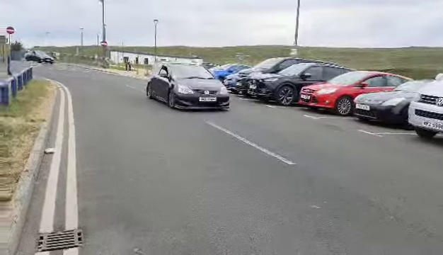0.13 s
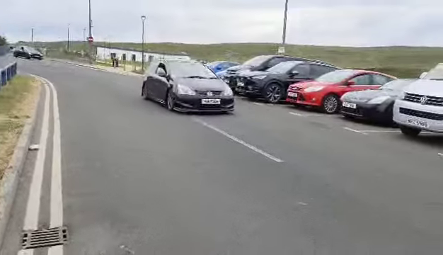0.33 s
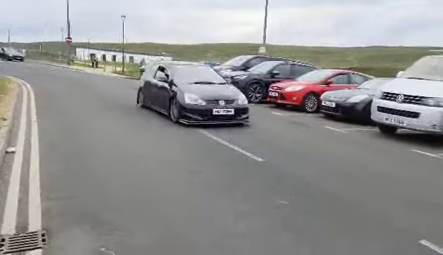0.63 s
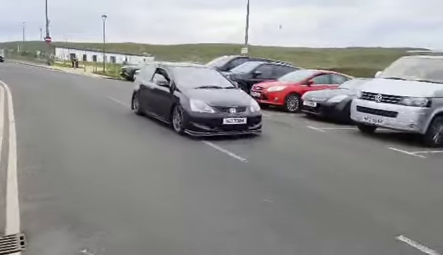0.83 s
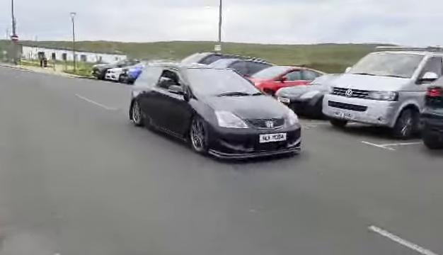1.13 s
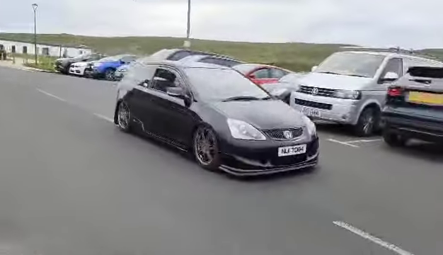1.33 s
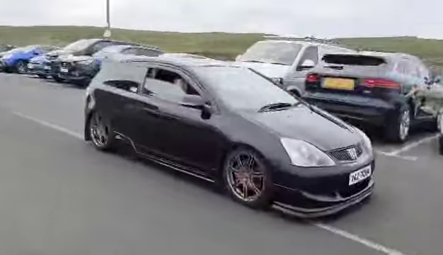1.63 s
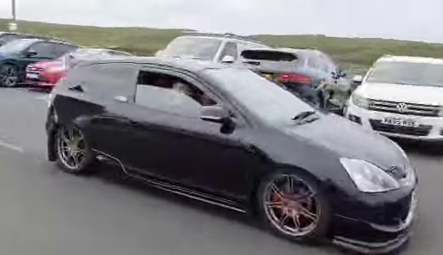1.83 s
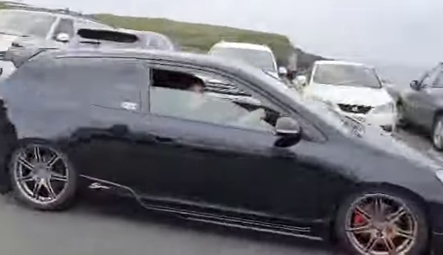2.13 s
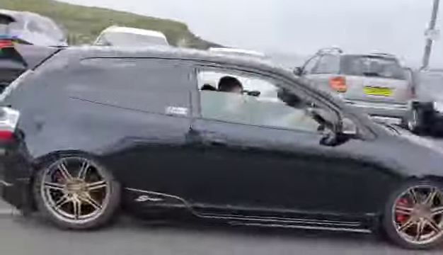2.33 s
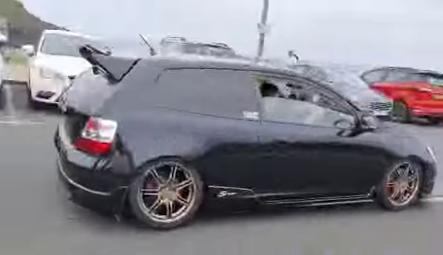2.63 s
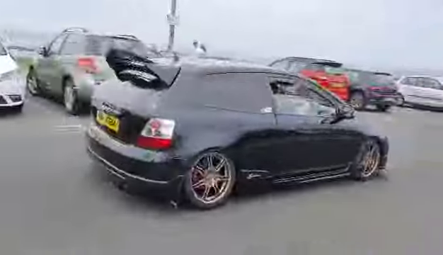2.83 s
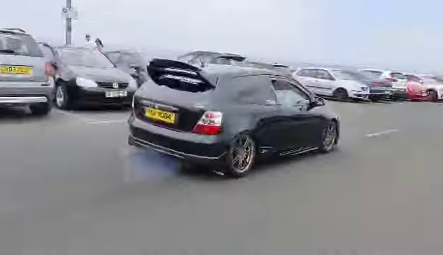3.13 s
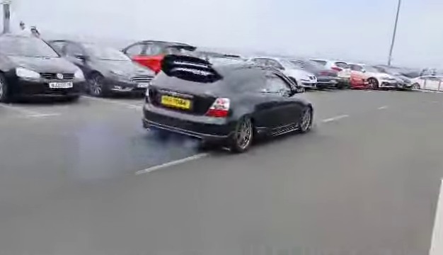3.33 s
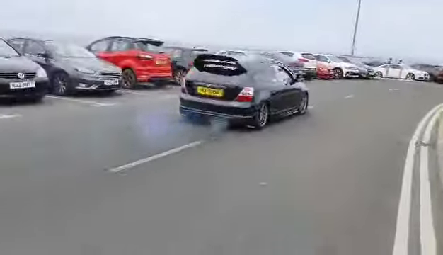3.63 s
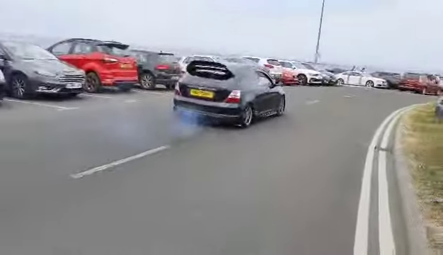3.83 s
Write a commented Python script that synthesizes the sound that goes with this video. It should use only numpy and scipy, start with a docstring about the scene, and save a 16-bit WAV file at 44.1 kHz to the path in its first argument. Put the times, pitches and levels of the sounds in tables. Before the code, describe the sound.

A small car with a loud exhaust burbles closer in an open car park, pops sharply as it passes the nearby microphone, then revs up and stutters on its limiter, with tyre roar beneath.

```python
"""In a seaside car park, a four-cylinder hatchback with a loud exhaust burbles up, pops as it passes close by
and revs into its limiter, where fuel cuts alternate with hissing blasts. Each firing rings the pipe (boom, hum,
rasp) and makes a puff in the noise of the gas. Tyre roar and air rumble are coloured noise, a small bird whistles
and chirps at first in gliding sines, and parked cars scatter the sound as a short burst of decaying noise."""
import sys
import numpy as np
from scipy import signal
from scipy.fft import rfft, irfft
from scipy.io import wavfile
from scipy.ndimage import uniform_filter1d, map_coordinates

SR = 44100
rng = np.random.default_rng(int(sys.argv[2]) if len(sys.argv) > 2 else 0)


def pcm_store(signal):
    """Save signal as 16-bit PCM."""
    levels = np.round(np.clip(np.atleast_2d(signal), -1, 1) * 32767)
    wavfile.write(sys.argv[1], SR, levels.astype(np.int16).T)


N = 176400
TOP_HZ = 13400  # upper edge of the microphone's range


def undb(db):
    """Decibels to gain."""
    return 10 ** (np.asarray(db) / 20)


def clock():
    """Time of every sample in seconds."""
    return np.arange(N) / SR


def curve(rows, axis=1):
    """One column of a table, joined by straight lines in time."""
    rows = np.array(rows)
    return np.interp(clock(), rows[:, 0], rows[:, axis])


def gate(start, end, rise_s, tail_s):
    """Attack, hold and exponential release."""
    t = clock()
    return np.clip((t - start) / rise_s, 0, 1) * np.exp(-np.maximum(t - end, 0) / tail_s)


def unit(x):
    """Scale to rms 1."""
    return x / np.sqrt(np.mean(x ** 2))


def even(x, size=1800):
    """Hold a pulse train near rms 1 whatever its rate, by dividing by its smoothed power."""
    power = uniform_filter1d(uniform_filter1d(x ** 2, size), size)
    return x / np.sqrt(np.abs(power) + 1e-14)


def walk(rate):
    """Smooth random drift, spread 1, changing about `rate` times a second."""
    size = int(SR / rate)
    return unit(uniform_filter1d(uniform_filter1d(rng.standard_normal(N), size), size))


def ring(x, colour):
    """Minimum-phase filter of the given colour: it rings after each pulse, never before."""
    hz, db = np.array(colour).T
    n = 2 * N
    f = np.maximum(np.arange(N + 1) * SR / n, 1)
    octaves_outside = np.maximum(np.log2(hz[0] / f), 0) + np.maximum(np.log2(f / hz[-1]), 0)
    level_db = np.interp(np.log(f), np.log(hz), db) - 24 * octaves_outside
    # folding the cepstrum onto positive time makes the filter causal
    cepstrum = irfft(np.log(undb(level_db)))
    cepstrum[1:N] *= 2
    cepstrum[N + 1:] = 0
    return irfft(rfft(x, n) * np.exp(rfft(cepstrum)))[..., :N]


def noise(colour):
    """Stereo noise at rms 1, alike in the bass and unrelated in the treble."""
    mid, side = rfft(rng.standard_normal((2, N)))
    blend_hz = 1180  # the ears are half alike here
    alike = 1 / (1 + (np.arange(len(mid)) * SR / N / blend_hz) ** 2)
    mid, side = mid * np.sqrt(1 + alike), side * np.sqrt(1 - alike)
    return unit(ring(irfft(np.array([mid + side, mid - side]), N), colour))


def pulses(times, sizes, order=8):
    """Band-limited clicks (windowed sincs) at exact times between samples."""
    out = np.zeros(N)
    at = times[:, None] * SR
    index = at.astype(int) + np.arange(1 - order, order + 1)
    shape = sizes[:, None] * np.sinc(index - at) * np.sinc((index - at) / order)
    inside = (index >= 0) & (index < N)
    np.add.at(out, index[inside], shape[inside])
    return out


# how the car rolls by: start_s, tyres_db, rumble_db
ROLLING = [(.07,-55,-67),(.25,-44.5,-43),(.7,-38.5,-61),(1.05,-37,-62),(1.5,-34.5,-51),(1.9,-36,-50),(2.3,-35,-28),(2.9,-29,-33.5),(3.4,-31.5,-39.5),(4,-35.5,-38.5)]
# colour of the tyre roar: band_hz, level_db
TYRE_COLOUR = [(300,-7.5),(450,0.5),(700,-3.5),(860,-8.5),(1140,-4),(1500,-10),(2400,-12),(2900,-15),(3700,-13),(5000,-8.5),(6100,-10.5),(6900,-19.5),(8200,-29.5),(13000,-49.5)]
# colour of the air rumble: band_hz, level_db
RUMBLE_COLOUR = [(20,-13.5),(45,-16),(80,-4.5),(150,-3.5),(300,-3.5),(600,-31.5),(1500,-60)]


def road():
    """Tyre roar swells as the car goes by; moving air rumbles on each port, mostly in common."""
    tyres = noise(TYRE_COLOUR) * undb(curve(ROLLING) + 1.67 * walk(20))
    pressure = rng.standard_normal((2, N)) + 5.2 * rng.standard_normal(N)
    air = unit(ring(pressure, RUMBLE_COLOUR))
    return tyres + air * undb(curve(ROLLING, axis=2))


# the bird's whistle: start_s, pitch_hz, level_db
WHISTLE = [(.1,5300,-82),(.15,5230,-55),(.2,5220,-56),(.225,5240,-34),(.262,5130,-37.5),(.285,4850,-52),(.32,4950,-34),(.345,4940,-48),(.37,4960,-31),(.42,4730,-71)]
# its notes, level before the arched swell, octave relative to the note:
# start_s, length_s, start_hz, end_hz, level_db, octave_db
CHIRPS = [(0.065,0.15,4150,4050,-58,-38),(0.416,0.11,3670,3550,-39,-16.5)]


def bird():
    """A thin wavering whistle, and falling notes with a weak octave: sines whose pitch glides."""
    t = clock()
    waver = 1 + 0.0039 * walk(74)
    whistle = np.sin(2 * np.pi * np.cumsum(curve(WHISTLE) * waver) / SR)
    out = whistle * undb(curve(WHISTLE, axis=2)) * (t < WHISTLE[-1][0])
    for start, length, from_hz, to_hz, db, octave_db in CHIRPS:
        along = np.clip((t - start) / length, 0, 1)
        pitch_hz = (from_hz + (to_hz - from_hz) * along) * waver
        angle = 2 * np.pi * np.cumsum(pitch_hz) / SR
        swell = np.sqrt(2 * np.abs(np.sin(np.pi * along)))
        out = out + undb(db) * swell * (np.sin(angle) + undb(octave_db) * np.sin(2 * angle))
    return out


def scatter(x):
    """Short diffuse echo from the parked cars, thin in the bass and different in each ear."""
    t = clock()[:SR // 2]
    t60_s = 0.22
    tail = rng.standard_normal((2, len(t))) * undb(-60 * t / t60_s)
    tail /= np.sqrt(np.sum(tail ** 2, axis=1, keepdims=True))
    tail = signal.sosfilt(signal.butter(1, 130, "high", fs=SR, output="sos"), tail)
    return signal.fftconvolve(x * np.ones((2, 1)), tail, axes=1)[:, :N]


# lag of the left ear as the tailpipe swings past: start_s, lag_ms
EAR_LAG = [(1.3,0.0068),(1.8,-0.042),(2.2,0.21),(2.75,0.23),(3.2,0.093),(3.8,0.024)]


def two_ears(x):
    """Sound from the side reaches one ear a little later; each ear takes half the lag."""
    half_lag = curve(EAR_LAG) / 1000 * SR / 2
    return np.array([map_coordinates(x, [np.arange(N) + side * half_lag], mode="nearest") for side in (-1, 1)])


# exhaust pops, and the bangs that open the limiter's blasts: start_s, thump_db, bark_db, crack_db
# (crack before the trims in pops())
POPS = [(1.494,-8,-40,-49),(1.965,-8,-19.5,-38),(2.027,-2.5,-11,-43),(2.039,-20,-10.5,-12),(2.295,-9.5,-15,-50),(2.304,-6.5,-15,-50),(2.328,-7,-3.5,-10.5),(2.354,-9,-12,-9.5),(3.264,-41,-30,-9.5),(3.546,-22,-18,-7.5),(3.829,-14.5,-14,-10.5),(3.841,-18,-10,-26)]
# colour of a pop's thump: band_hz, level_db
THUMP_COLOUR = [(60,-16.5),(150,1.5),(250,1),(400,-20.5),(900,-47)]


def pops():
    """Unburnt fuel goes off in the pipe: a thump, a bark, a shock front and a short crack of gas."""
    times, thump_db, bark_db, crack_db = np.array(POPS).T
    snap_db = crack_db - 2.5  # shock front
    body = 0
    for colour, db in ((THUMP_COLOUR, thump_db), (RASP_COLOUR, bark_db), (GAS_COLOUR, snap_db)):
        wave = ring(pulses(times, undb(db)), colour)
        # the highest peak takes the level of the loudest pop
        body = body + wave / np.abs(wave).max() * undb(db.max())
    crack = sum(gate(s, s, 0.00021, tail_s=0.0045) * undb(db) for s, db in zip(times, crack_db))
    return body, 0.5 * crack * noise(GAS_COLOUR)


# engine speed before its waver, burbling up: start_s, firings_hz
SPEED_LOW = [(0.1, 51), (0.23, 50.8), (0.502, 49.2), (0.602, 53.7), (0.994, 50), (1.178, 56), (1.444, 44.3),
             (1.498, 47.9), (1.644, 57.6), (1.728, 63), (1.98, 83.7)]
# engine speed before its waver, revving: start_s, firings_hz
SPEED_HIGH = [(2.06, 81.83), (2.102, 93.25), (2.15, 99.74), (2.222, 108.2), (2.3, 113.3), (2.37, 110.9),
              (2.602, 126.3), (2.658, 126.1), (2.796, 161), (3.0, 210.9), (3.03, 216.1)]
CUT_HZ, RESUME_HZ = 213, 204.9  # firing rate before waver where fuel stops and returns
LOW_WAVER, REV_WAVER, COAST_WAVER = 0.013, 0.0034, 0.0153  # spread, share of the speed


def firing_phase():
    """Count of firings: the driver's rev, then the limiter's saw between two speeds, with a random waver."""
    saw = []
    for cut, back, *_ in LIMITER:
        saw += [(cut, CUT_HZ), (back, RESUME_HZ)]
    waver = curve([(1.5, LOW_WAVER), (2.6, REV_WAVER), (3.1, COAST_WAVER)]) * walk(86)
    return np.cumsum(curve([*SPEED_LOW, *SPEED_HIGH, *saw]) * (1 + waver)) / SR


def firings(phase, scatter_db, jitter_s, uneven_db=0):
    """One pulse per firing, each a little different in time and strength; a four-step pattern may add to it."""
    k = np.arange(1, int(phase[-1]))
    chance = rng.standard_normal((len(k), 2))
    times = np.interp(k, phase, clock()) + jitter_s * chance[:, 0]
    strength_db = uneven_db * np.cos(np.pi * k / 2) + scatter_db * chance[:, 1]
    return pulses(times, undb(strength_db))


# rev limiter, hum as the cut begins, rasp as it ends, throb depth 0-1:
# cut_s, back_s, hum_db, throb_depth, rasp_db, blast_db
LIMITER = [(3.048,3.263,-9,0.02,-15.5,-15),(3.328,3.544,-15,0.9,-17.5,-16.5),(3.608,3.827,-13.5,0.71,-18.5,-16),(3.885,4.097,-14,0.34,-19,-26)]
HUM_FADE_DB_S, RASP_GROW_DB_S = -61, 35.5  # slopes during a cut, dB per second
THROB_HZ, THROB_FIRST_S = 21.8, 0.047  # rate; first crest after the cut
BLAST_TAIL_S = 0.0083
IGNITION_DB, IGNITION_S = -13, 0.012  # bright flare under the blast level, and its decay


def limiter():
    """Limiter envelopes: a throbbing hum and growing rasp in each fuel cut, a flaring blast when it returns."""
    hum, rasp, blast, flare, burning = np.zeros((5, N))
    next_cuts = [row[0] for row in LIMITER[1:]] + [np.inf]
    for (cut, back, hum_db, throb, rasp_db, blast_db), until in zip(LIMITER, next_cuts):
        age = np.clip(clock() - cut, 0, back - cut)
        coast = gate(cut, back, 0.065, 0.0034)
        burn = gate(back, until, 0.0021, BLAST_TAIL_S)
        throbbing = 1 + throb * np.cos(2 * np.pi * THROB_HZ * (age - THROB_FIRST_S))
        hum += coast * undb(hum_db + HUM_FADE_DB_S * age) * throbbing
        rasp += coast * undb(rasp_db + RASP_GROW_DB_S * (age - (back - cut)))
        blast += burn * undb(blast_db)
        flare += gate(back, back, 0.0017, IGNITION_S) * undb(blast_db + IGNITION_DB)
        burning += burn
    return hum, rasp, blast, flare, burning


# the pipe's two low resonances: start_s, boom_db, hum_db
LOW_LEVELS = [(0.07, -56, -46.5), (0.28, -44, -45), (0.41, -38.5, -33.5), (0.62, -24.5, -27),
              (0.82, -25, -30.5), (1.0, -39.5, -36.5), (1.44, -26, -20), (1.485, -26, -20),
              (1.51, -17, -17.5), (1.59, -12, -17), (1.67, -23, -13), (1.78, -14, -14), (1.88, -22, -21),
              (1.98, -19, -15), (2.05, -22, -24.5), (2.16, -21.5, -12.5), (2.25, -14.5, -37),
              (2.3, -18, -20), (2.35, -20.5, -22), (2.62, -15, -18.5), (2.68, -14, -29.5),
              (2.72, -19.5, -19), (2.79, -20.5, -19), (2.83, -28, -16), (3.04, -40, -21)]
# colour of the boom: band_hz, level_db
BOOM_COLOUR = [(45,-32),(60,-23),(80,-11),(105,-0.5),(135,5),(160,-6),(190,-13.5),(260,-49)]
# colour of the hum: band_hz, level_db
HUM_COLOUR = [(90,-38.5),(140,-26.5),(180,6.5),(215,1.5),(250,8),(275,-6),(315,-8),(360,-23),(480,-30),(900,-54.5)]
FIRING_JITTER_S = 0.00005


def low_tone(phase, pulling, coast_hum, burning):
    """Firings ring the pipe's boom and, in opposite polarity, its hum."""
    train = firings(phase, 1.5, FIRING_JITTER_S)
    boom = even(ring(train, BOOM_COLOUR)) * pulling * undb(curve(LOW_LEVELS))
    hum_level = pulling * undb(curve(LOW_LEVELS, axis=2)) + coast_hum + burning * undb(-29.5)
    return boom - even(ring(train, HUM_COLOUR)) * hum_level


# the pipe's rasp before the direct and scattered trims: start_s, level_db
RASP_LEVEL = [(.2,-80.5),(.7,-47),(1.05,-72),(1.51,-46),(1.75,-42.5),(1.826,-26.5),(1.874,-55),(1.94,-38),(1.97,-40),(2.01,-46),(2.06,-29.5),(2.104,-20),(2.16,-29.5),(2.242,-44),(2.32,-34),(2.345,-22),(2.4,-20.5),(2.516,-18.5),(2.63,-24),(2.75,-20),(2.9,-20.5),(3.04,-26.5)]
# colour of the rasp under load, also the bark of a pop: band_hz, level_db
RASP_COLOUR = [(200,-40),(350,-7.5),(470,-6.5),(595,2.5),(650,-2),(740,5.5),(850,3),(970,-2),(1100,-34),(1300,-18),(1800,-36),(2450,-18.5),(3100,-53),(7000,-54)]
# colour of the rasp while fuel is cut: band_hz, level_db
COAST_COLOUR = [(200,-24),(420,-15),(530,-31),(590,5.5),(630,0),(680,5),(740,-9),(800,1.5),(840,2),(900,-1),(1000,-10),(1300,-23),(1800,-27.5),(2450,-26.5),(4000,-39.5)]


def rasp_tone(phase, pulling, coast_rasp, burning):
    """Firings ring the pipe's upper resonances; unloaded, the four cylinders differ in strength."""
    loaded = even(ring(firings(phase, 2, FIRING_JITTER_S), RASP_COLOUR))
    unloaded = even(ring(firings(phase, 3.5, 0.00006, uneven_db=2.5), COAST_COLOUR))
    loaded_level = pulling * undb(curve(RASP_LEVEL)) + burning * undb(-33)
    return loaded * loaded_level + unloaded * coast_rasp


def torn(x, count=28):
    """Turbulence makes each band of the hiss flicker alone: narrow bands swell and sink independently."""
    spectrum = rfft(x)
    place = np.minimum(np.arange(spectrum.shape[-1]) * SR / N / TOP_HZ, 1) * count
    out = 0
    for k in range(count + 1):
        band = irfft(spectrum * np.maximum(1 - np.abs(place - k), 0), N)
        out = out + band * unit(undb(4 * walk(43)))  # 4 dB spread
    return out


# gas hiss up to the first fuel cut: start_s, level_db
GAS_LEVEL = [(.2,-76),(1.3,-53),(2.03,-42.5),(2.042,-25),(2.07,-32.5),(2.11,-23.5),(2.2,-38),(2.32,-50),(2.36,-23.5),(2.41,-23),(2.48,-19.5),(2.68,-22),(2.74,-18),(2.92,-17),(3.03,-12.5)]
# colour of the gas hiss, the flares and the cracks: band_hz, level_db
GAS_COLOUR = [(1200,-5.5),(1900,-20.5),(2430,0.5),(2850,-16),(3300,-2.5),(4200,-5.5),(5800,3.5),(7300,-8.5),(10200,-8),(13300,-24)]
# colour of the blasts: band_hz, level_db
BLAST_COLOUR = [(53, -36), (90, -15), (208, -0.5), (330, -12.5), (442, -5.5), (746, -19.5), (863, -10),
                (2040, -14.5), (3510, -12), (4240, -14), (5450, -6.5), (8280, -20.5), (12600, -37.5)]
# colour of the hiss that lingers from the first cut: band_hz, level_db
COAST_GAS_COLOUR = [(650,-25),(1100,3),(1650,-15),(2360,10),(2900,-8.5),(5860,-21),(10300,-24)]
# near the limiter the hiss broadens into a blast: start_s, end_s
FULL_BLAST_S = (2.82, 3.132)


def gas_hiss(phase, pulling, blast, flare):
    """Turbulent gas: flickering noise that pulses once per firing with a rough grain."""
    grain = unit(uniform_filter1d(rng.standard_normal(N), size=24))
    pulse = 1 + 0.23 * np.cos(2 * np.pi * (phase - 0.15))
    puffs = unit(pulse * undb(0.8 * grain))  # 0.8 dB grain
    broad = np.interp(clock(), FULL_BLAST_S, (0, 1))
    jet = noise(GAS_COLOUR) * np.sqrt(1 - broad) + noise(BLAST_COLOUR) * np.sqrt(broad)
    pulled = jet * pulling * undb(curve(GAS_LEVEL))
    gas = torn(pulled + noise(BLAST_COLOUR) * blast + noise(GAS_COLOUR) * flare)
    first_cut = LIMITER[0][0]
    gas += noise(COAST_GAS_COLOUR) * gate(first_cut, first_cut, 0.051, tail_s=1.8) * undb(-40)
    return gas * puffs * undb(np.array([[-0.5], [0.5]]))  # 1 dB to the right


def exhaust():
    """One firing count drives the pipe's low tone, its rasp and the gas hiss, so they beat together."""
    phase = firing_phase()
    hum, rasp, blast, flare, burning = limiter()
    pulling = gate(0, LIMITER[0][0], 0.007, BLAST_TAIL_S)
    low = low_tone(phase, pulling, hum, burning)
    blare = rasp_tone(phase, pulling, rasp, burning)
    return low, blare, gas_hiss(phase, pulling, blast, flare)


SCATTER_NEAR_DB, SCATTER_FAR_DB = -23, -9.5  # low tone's scattering on approach and after the pass
RASP_SCATTER_NEAR_DB = 2  # on approach the body hides the tailpipe
RASP_TRIM_DB = 2  # direct rasp falls by this as facing goes from 0 to 1


def scene():
    """On approach the rasp arrives mostly by reflection; past the listener, the pipe is direct and scattered."""
    low, rasp, gas = exhaust()
    thumps, cracks = pops()
    low, hiss = low + thumps, gas + cracks
    facing = curve([(1.9, 0.071), (2.5, 1)])  # how far the tailpipe faces the listener, 0-1
    direct = low + rasp * undb(RASP_TRIM_DB * (0.5 - facing))
    wet = low * undb(curve([(2.0, SCATTER_NEAR_DB), (3.2, SCATTER_FAR_DB)]))
    wet += rasp * undb(RASP_SCATTER_NEAR_DB + (SCATTER_FAR_DB - RASP_SCATTER_NEAR_DB) * facing)
    return two_ears(direct) + hiss + scatter(wet + undb(-14.0) * hiss) + road() + bird()


def record(dry):
    """The microphone opens after a moment, rounds the highest peaks and cuts the top."""
    start_s, fade_s, ceiling = 0.065, 0.037, 0.98
    opened = dry * np.clip((clock() - start_s) / fade_s, 0, 1)
    rounded = opened / (1 + (np.abs(opened) / ceiling) ** 6) ** (1 / 6)
    return signal.sosfiltfilt(signal.ellip(8, 0.1, 60, TOP_HZ, fs=SR, output="sos"), rounded)


dry = scene()
out = record(dry)
pcm_store(out)
```